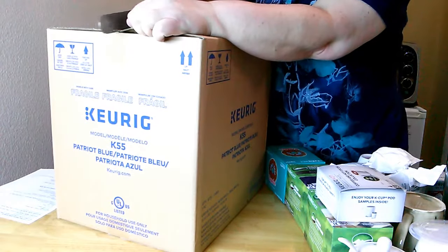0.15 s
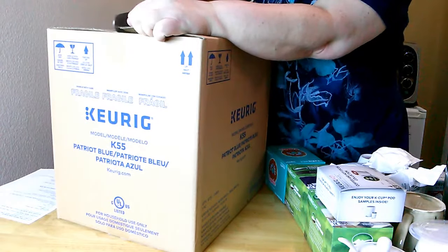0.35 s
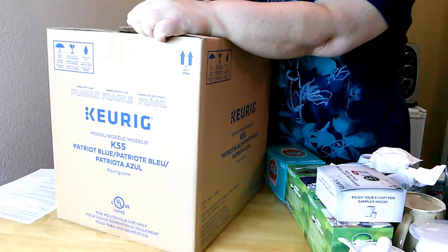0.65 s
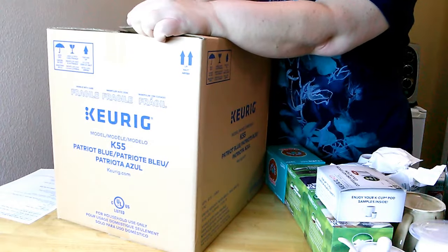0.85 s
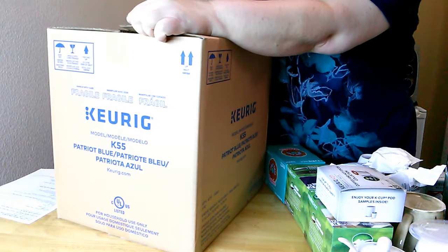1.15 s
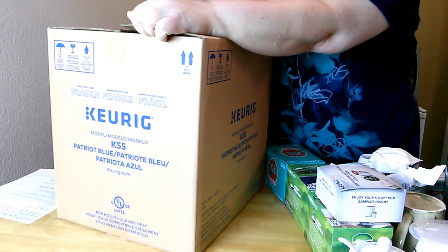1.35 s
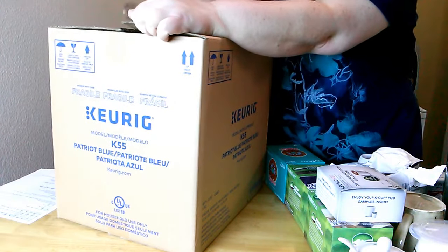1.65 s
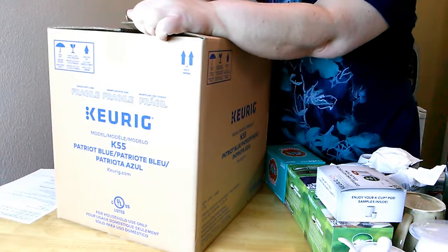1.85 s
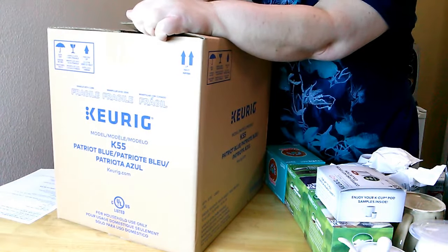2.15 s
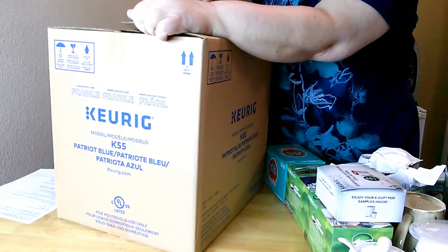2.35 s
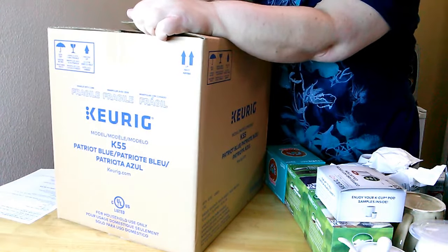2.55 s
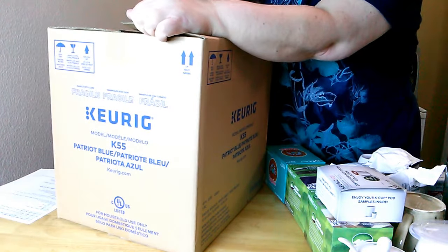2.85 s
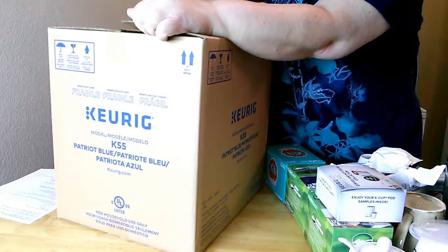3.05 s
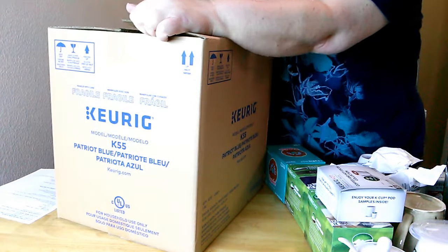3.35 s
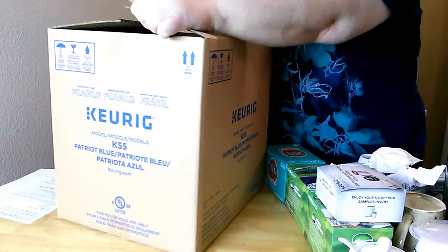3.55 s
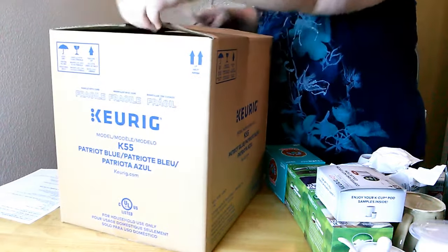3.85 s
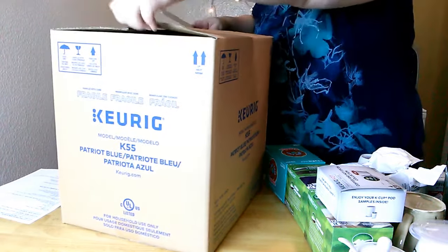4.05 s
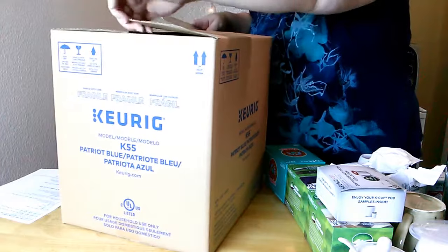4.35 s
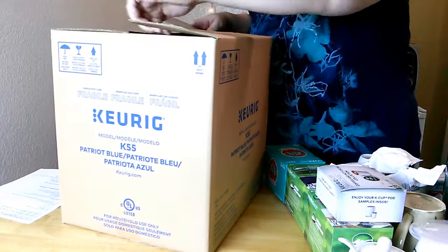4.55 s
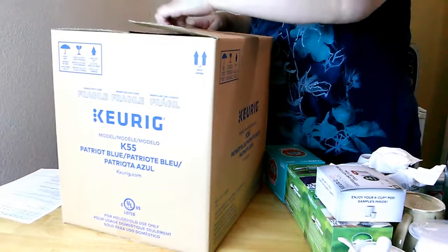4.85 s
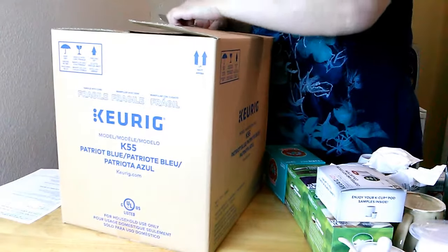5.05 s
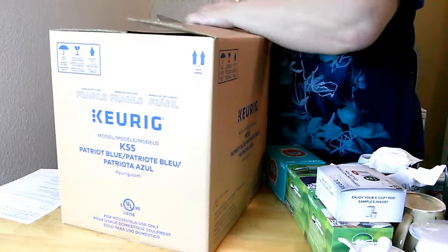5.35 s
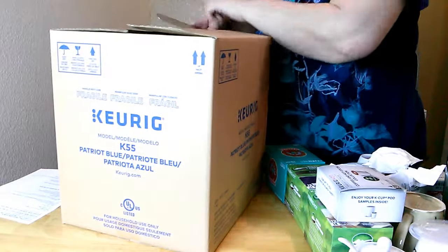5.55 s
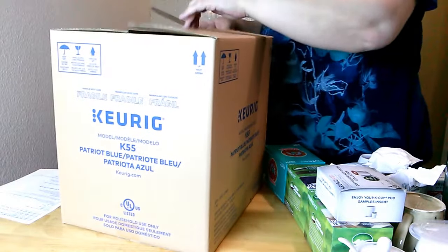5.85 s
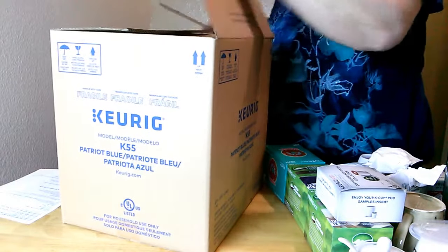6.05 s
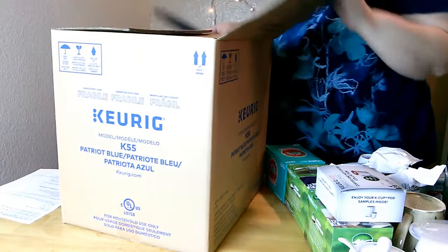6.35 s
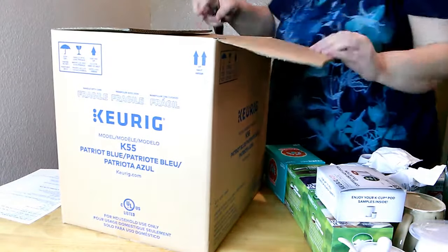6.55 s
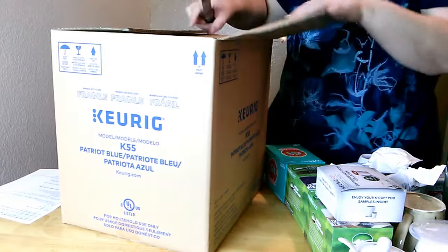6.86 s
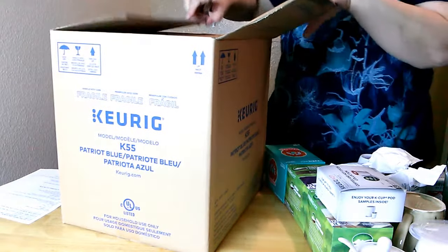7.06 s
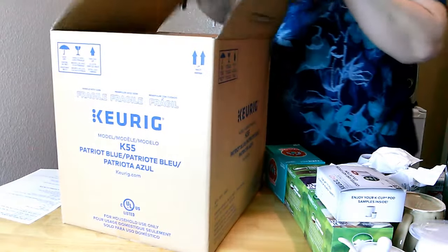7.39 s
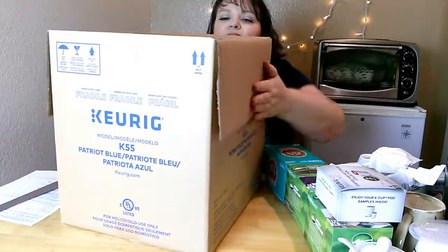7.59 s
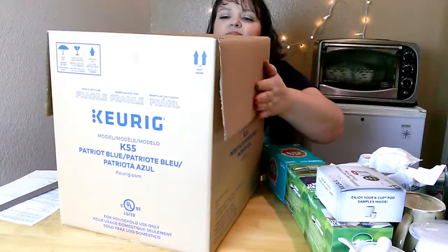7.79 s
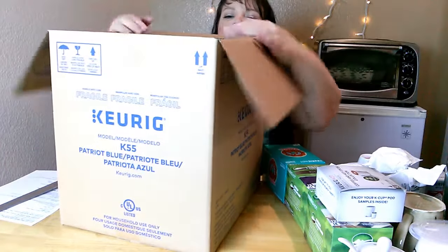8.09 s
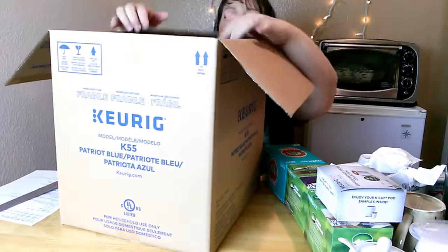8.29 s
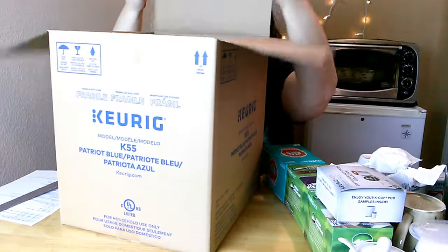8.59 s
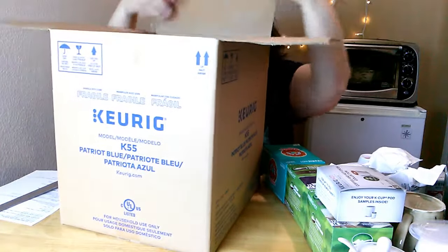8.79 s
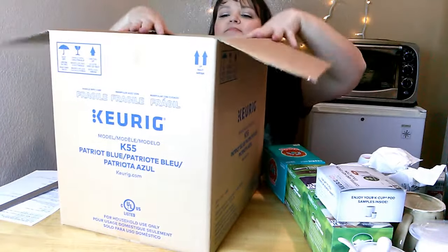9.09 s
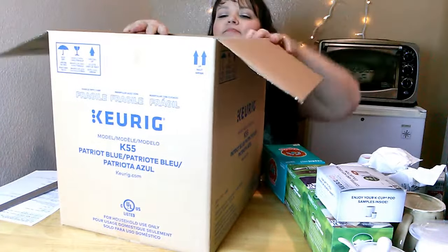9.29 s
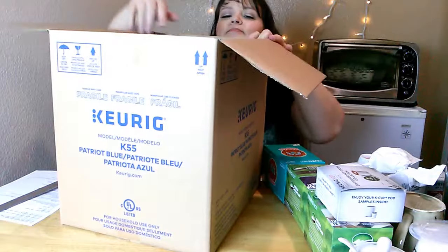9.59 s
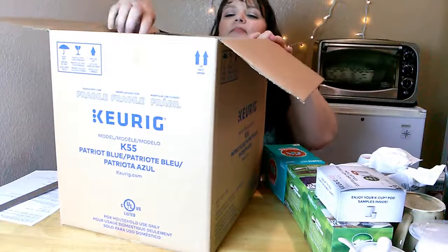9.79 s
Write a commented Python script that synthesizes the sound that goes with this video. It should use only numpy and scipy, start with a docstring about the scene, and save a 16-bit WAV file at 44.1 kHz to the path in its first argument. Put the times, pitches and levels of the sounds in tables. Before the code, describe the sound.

Close up in a small, hard-walled room, someone opens a stiff cardboard box. Crisp cracks of tape and fibres come first, mixed with boomy knocks and the uneven scratch of palms over card. Midway, a run of snaps builds to the loudest blow. The flaps then rasp and briefly creak as they fold open, and the handling goes on with scrapes and hollow thuds.

```python
"""A small hard room, one microphone close to a large cardboard box on a table. Hands and a blade work
at the taped top, then fold the flaps open. Tape and fibres snap, the panels boom when knocked, palms
and flaps scrape by stick and slip, and a fold creaks. At 7.6 s the sound breaks off and starts afresh.
The microphone has a bright peak and overloads on the loudest blows."""
import sys
import numpy as np
from scipy import signal
from scipy.io import wavfile
from scipy.ndimage import uniform_filter1d

SR = 44100
rng = np.random.default_rng(int(sys.argv[2]) if len(sys.argv) > 2 else 0)


def file_out(sig):
    """Save sig as 16-bit WAV at sys.argv[1]."""
    # one column per channel
    cols = np.atleast_2d(sig).T
    # limit, then scale
    lim = np.clip(cols, -1, 1)
    pcm = np.round(lim * 32767).astype(np.int16)
    wavfile.write(sys.argv[1], SR, pcm)


N = 437902
BREAK_S = 7.602

# Modes of the box's panels and air. Each row: pitch in Hz, width in Hz, level in dB.
BOX_MODES = [(90, 19, -12), (151.8, 52, 0.5), (181.4, 61, -2), (233.5, 22, -4), (278, 77, -5),
             (379.3, 58, 2.5), (432.8, 23, -1.5), (484.7, 28, -3), (564, 76, -3.5), (669, 66, -8),
             (839, 45, -10.5)]
# Modes of the flaps, stiff and well damped. Each row: pitch in Hz, width in Hz, level in dB.
FLAP_MODES = [(697, 667, -2), (1205, 326, 0.5), (1377, 493, 0.5), (1994, 1500, -7)]
# Dry fibres as the bright microphone hears them. Each row: frequency in Hz, level in dB.
FIBRE_SPECTRUM = [(900, -47.5), (1900, -8.5), (2700, -4), (3900, -4), (5400, 0), (6300, -1.5), (7600, -11),
                  (11000, -17), (16000, -31)]


def knocks():
    """A blow gives a short thud and wakes the box modes near its pitch most; after-touches blur them."""
    # Each row: start in seconds, level in dB, pitch that the blow favours in Hz.
    blows = [(0.048, -26.5, 90.5), (0.472, -4, 188), (0.838, -12, 240), (0.945, -17, 257),
             (1.262, -23, 340), (1.508, -24, 241), (1.755, -10.5, 810), (1.879, -12.5, 390),
             (2.081, -5, 239.6), (2.089, -2.5, 185), (2.256, -5.5, 150), (2.388, -13.5, 340),
             (2.43, -14.5, 377), (2.611, -11, 240), (3.009, -12, 254), (3.388, -24, 134), (3.58, 1.5, 396),
             (3.584, -3.5, 129), (3.897, -25.5, 400), (4.118, -25, 99.6), (4.149, -15.5, 403),
             (4.805, -22, 252), (4.908, -16, 420), (4.983, -17.5, 426), (5.023, -9.5, 442),
             (5.089, -12, 418), (5.375, -6.5, 597), (5.467, -8, 790), (5.48, 8, 430), (5.5, -4, 165),
             (5.956, -17.5, 342), (6.019, -20.5, 173), (6.245, -16, 890), (7.7, -22, 619), (7.723, 1, 132),
             (8.142, -15.5, 128), (8.258, -20.5, 375), (8.448, -18, 571), (8.507, -20.5, 388),
             (8.581, -14.5, 405), (8.749, -6.5, 160), (8.753, -6.5, 520), (8.914, -22, 151),
             (9.039, -17.5, 135), (9.741, -16, 694), (9.875, -1.5, 182), (9.881, -4.5, 620)]
    out, t = np.zeros(N), np.arange(1500) / SR
    mode_hz = np.array(BOX_MODES)[:, :1]
    for start, db, hz in blows:
        spread_octaves = np.clip(0.9 + 0.008 * db, 0.2, 2)  # harder blows wake more modes
        woken = 1 / (1 + (np.log2(mode_hz / hz) / spread_octaves) ** 2)
        thud = ring([(hz, 0.79 * hz, 0)], size=6000)
        body = ring(BOX_MODES, woken, size=6000) + 0.52 * thud
        push = 0.044 * rng.standard_normal(len(t)) * np.exp(-t / 0.012)
        push[0] = 1  # the blow itself, ahead of the after-touches
        boom = signal.fftconvolve(push, body)
        add(out, start, 0.88 * gain_of(db) * boom / abs(boom).max())
    return out


def snaps():
    """Tape and fibres let go in a burst, then a few splinters, heard bare and through the card."""
    # Each row: start in seconds, level in dB, share that the card takes up in dB.
    tears = [(0.0476, -32, 1), (0.362, -28.5, -11), (0.4721, 3.5, 1), (0.5317, -3.5, -9), (0.6, -14, -22),
             (0.629, -5.5, -17), (0.6584, -3, -8), (0.718, -12.5, -20), (0.835, -18, 4),
             (1.0207, -17, -4.5), (1.1266, -23.5, -3), (1.33, -34, -3), (1.484, -30, -5), (1.51, -24.5, 0),
             (1.6008, -18.5, -10), (1.854, -27.5, -10), (1.8816, -27.5, 11.5), (1.939, -19.5, -12),
             (2.0783, -17.5, 9.5), (2.0906, -8.5, 0.5), (2.248, -19, 8.5), (2.392, -14, 6),
             (2.4298, -13, -2.5), (3.0651, -15, -3.5), (3.144, -20.5, -36), (3.1835, -15, -13),
             (3.2632, -17.5, -17), (3.436, -31.5, -8), (3.5833, -11.5, 1), (3.5994, -3, -6),
             (3.8938, -31, 3), (4.123, -23.5, -0.5), (4.302, -29.5, 8.5), (4.4432, -28.5, -34),
             (4.6942, -9, 0), (4.7321, -12.5, -17), (4.804, -16, 0.5), (4.8504, -9.5, -1.5),
             (4.9105, -9, -3.5), (4.9837, -7, -7), (5.024, 2.5, -5), (5.092, -4, 1), (5.1478, -11.5, -10),
             (5.1622, -9, -3), (5.376, -6.5, 6.5), (5.3931, -7, -4), (5.468, 4, 3), (5.766, -35, 11.5),
             (6.1183, -21.5, -9), (6.1661, -22, -7), (6.434, -24.5, -2.5), (7.3937, -27.5, -33),
             (7.6997, -23, 20), (7.7249, -20, 14.5), (7.837, -33, -10), (7.935, -35, 9), (8.0502, -22, -1),
             (8.4482, -10, 2), (8.5372, -15.5, 7), (8.5834, -4, -8.5), (8.7474, -19, 5), (9.3585, -25, 4.5),
             (9.7173, -23.5, -13), (9.8776, -36.5, 26)]
    bare, card, t = np.zeros(N), np.zeros(N), np.arange(4000) / SR
    tear = (1 - np.exp(-t / 0.0016)) * np.exp(-t / 0.0065)
    for start, db, card_db in tears:
        noise, scatter = rng.standard_normal((2, len(t)))
        clumps = unit_rms(uniform_filter1d(scatter, 90)) ** 2
        splinters = 0.089 * clumps * (1 - np.exp(-t / 0.00078)) * np.exp(-t / 0.036)
        burst = 0.5 * noise * (tear + splinters)
        add(bare, start, gain_of(db) * burst)
        add(card, start, gain_of(db + card_db) * burst)
    return through(bare, colour(FIBRE_SPECTRUM)) + through(card, ring(FLAP_MODES))


def rubbing():
    """The same slips scratch the surface and rasp the card; slower lurches shake the lid and walls."""
    scratch, rasp, on_lid, on_walls = hand_strokes()
    slips = wandering_contact(stick_slip(per_s=1300, spread_db=3, hiss=1.4), depth_db=2.5)
    lurches = stick_slip(per_s=230, spread_db=4, hiss=1.3)
    is_lid = np.array(BOX_MODES)[:, :1] > 330  # lower modes belong to the big walls
    # Air pushed by the swaying panels.
    sway = colour([(15, -15), (40, -23), (70, 3.5), (120, 1.5), (400, -63.5)], size=8192)
    walls = ring(BOX_MODES, ~is_lid, size=8192) + gain_of(-14) * sway
    return (through(scratch * slips, colour(FIBRE_SPECTRUM))
            + through(rasp * slips, ring(FLAP_MODES))
            + through(on_lid * lurches, ring(BOX_MODES, is_lid))
            + through(on_walls * lurches, walls))


def hand_strokes():
    """Envelopes of scratch, rasp, lid and walls: a palm or flap lands, swells or sags, and lifts."""
    # Each row: start and length in seconds, swell from start to end in dB, then levels in dB of
    # surface scratch, card rasp, weight on the lid and weight on the walls.
    strokes = [(0.036, 0.1, 0, -49, -33, -37, -34), (0.085, 0.32, -10, -53, -56, -49, -49.5),
               (0.344, 0.54, 0, -40.5, -38.5, -36, -39.5), (0.757, .6, -6, -46, -44.5, -39.5, -31),
               (1.441, 0.32, 9, -45, -42, -32, -28), (1.633, 0.21, 0, -40, -39, -40, -39),
               (1.836, 0.15, -4, -65, -43, -52, -29.5), (2.008, 0.35, -1, -53, -50, -54, -53),
               (2.262, 0.46, 7, -36, -36, -36, -35), (2.574, 0.32, -3.5, -29.5, -32.5, -30.5, -25.5),
               (2.79, 0.47, 4, -37, -39.5, -32, -31.5), (3.337, 0.21, -10, -50, -51, -52, -46),
               (3.505, 0.19, 15, -26, -29.5, -21.5, -40), (3.585, .1, -3, -22, -30, -22, -48),
               (3.678, 0.22, -5, -47, -46, -47, -49), (3.861, 0.1, -5, -47.5, -37.5, -49, -37),
               (4.015, 0.12, 6, -48.5, -46, -67, -40), (4.101, 0.25, -19, -46, -45, -37, -40),
               (4.37, .36, 5, -44, -44.5, -43.5, -46), (4.644, 0.46, -1, -41.5, -47, -38, -42.5),
               (5.131, .14, -5, -30.5, -34, -40, -40), (5.342, 0.28, 6, -32.5, -33, -29, -50),
               (5.47, .16, -8, -40, -36, -18, -36), (5.75, .1, -4, -52, -42, -38, -44),
               (5.515, .24, -7.5, -52.5, -52.5, -39.5, -42), (5.947, 0.21, -5, -51, -49.5, -43.5, -36.5),
               (6.09, 0.16, -2, -45.5, -40, -45, -48), (6.236, 0.083, -4, -54, -34.5, -41, -50),
               (6.401, 0.41, -13, -55, -57, -51, -49.5), (6.737, 0.11, -5, -44.5, -45, -38, -44),
               (6.949, .27, -7, -40.5, -41.5, -39, -42.5), (6.986, 0.12, -3, -43, -25.5, -42, -42),
               (7.2, 0.34, -2, -64, -59.5, -57, -52), (7.479, 0.32, 3, -34, -31.5, -36.5, -42),
               (7.603, 0.29, 2, -40, -36, -32.5, -33), (7.898, 0.073, 0, -57, -45, -41, -42),
               (7.945, 0.19, 7, -41, -45, -39.5, -40), (8.06, 0.39, -4.5, -31, -37, -46, -37),
               (8.35, 0.44, 4, -37.5, -35, -34.5, -36.5), (8.415, .1, 0, -28, -28, -34, -40),
               (8.703, 0.18, -10, -37, -36.5, -27.5, -47), (8.87, .32, 5, -41, -42.5, -37.5, -39),
               (9.169, 0.21, 5, -52.5, -48, -52, -48.5), (9.33, 0.52, -3, -41.5, -36, -39, -37),
               (9.848, 0.13, -3, -45.5, -39, -22.5, -43)]
    # The box is never quite let go: resting levels in dB of scratch, rasp, lid and walls.
    rest_db = [-69, -70.5, -59.5, -57.5]
    land_s, lift_s, touch_db = 0.046, 0.071, -19
    power = np.outer(np.ones(N), gain_of(rest_db) ** 2)
    for start, length, swell_db, *levels_db in strokes:
        t = np.arange(0, length, 1 / SR)
        land, lift = np.minimum([land_s, lift_s], 0.5 * length)
        loose = np.clip(np.maximum(1 - t / land, 1 - (length - t) / lift), 0, 1)
        shape = gain_of(touch_db * loose + swell_db * (t / length - 0.5))
        shape *= (start + t < BREAK_S) == (start < BREAK_S)  # no stroke outlasts the break
        add(power, start, np.outer(shape, gain_of(levels_db)) ** 2)
    return np.sqrt(power).T


def stick_slip(per_s, spread_db, hiss):
    """Card catches and lets go: sparse clicks of uneven size over a smooth hiss."""
    sizes = gain_of(spread_db * np.minimum(rng.exponential(1, N), 4))
    slipping = rng.random(N) < per_s / SR
    clicks = unit_rms(sizes * slipping * rng.standard_normal(N))
    return unit_rms(clicks + hiss * rng.standard_normal(N))


def wandering_contact(x, depth_db):
    """The contact wanders over the card, so patches of the spectrum come and go."""
    spectrum = signal.stft(x, nperseg=512)[2]
    patches = uniform_filter1d(rng.standard_normal(spectrum.shape), 9, axis=0)
    patches = unit_rms(uniform_filter1d(patches, 10, axis=1))
    return signal.istft(spectrum * gain_of(depth_db * patches), nperseg=512)[1][:N]


def creaks():
    """A short run of slips in a fold of the card rings its few modes."""
    # Each row: start in seconds, level in dB.
    slip_runs = [(6.435, -43.5), (6.515, -40), (6.585, -41), (6.686, -39.5), (6.777, -28.5)]
    # Each row: pitch in Hz, width in Hz, level in dB.
    fold_modes = [(850, 50, -6), (1440, 53, 5), (2390, 99, -9.5)]
    out = np.zeros(N)
    for start, db in slip_runs:
        slips = rng.standard_normal(700) * np.hanning(700)
        creak = signal.fftconvolve(slips, ring(fold_modes))
        add(out, start, gain_of(db) * creak / abs(creak).max())
    return out


def room(x, wet_db, patterns=4):
    """The hands move about the box, so the pattern of echoes keeps changing."""
    turn = np.pi * 4.5 * np.arange(len(x)) / SR
    shares = [np.sqrt(2 / patterns) * np.cos(turn + np.pi * k / patterns) for k in range(patterns)]
    return x + gain_of(wet_db) * sum(through(x * share, echoes()) for share in shares)


def echoes():
    """Hard walls return sparse echoes of random sign, each band dying at its own speed."""
    # Each row: frequency in Hz, time to fall by 60 dB in seconds.
    decay_times = [(100, 0.37), (700, 0.3), (5000, 0.25), (12000, 0.29)]
    taps = np.zeros(SR // 2)
    slots = np.arange(140, len(taps) - 20, 20)
    taps[slots + rng.integers(0, 20, len(slots))] = rng.choice([-1., 1.], len(slots))
    hz, t, spectrum = signal.stft(taps, SR, nperseg=256)
    decay = gain_of(-60 * t / curve_at(decay_times, hz)[:, None])
    tail = signal.istft(spectrum * decay, SR, nperseg=256)[1]
    return tail / np.linalg.norm(tail)


def room_tone():
    """Steady noise of the room and the microphone."""
    # Each row: frequency in Hz, level in dB.
    noise_spectrum = [(18, -20.5), (30, -3.5), (220, -14), (700, -23), (3000, -36.5), (16000, -41.5)]
    return gain_of(-49) * through(rng.standard_normal(N), colour(noise_spectrum, size=8192))


def suppress(x, knee_db, slope):
    """A noise suppressor pulls the moments below its knee further down."""
    power_db = 10 * np.log10(abs(uniform_filter1d(x ** 2, 900)) + 1e-12)
    under_db = np.clip(knee_db - power_db, 0, 14)
    return x / gain_of(slope * uniform_filter1d(under_db, 400))


def ring(modes, weight=1., size=4096):
    """Response of struck modes: dying sines of alternate sign, energy 1."""
    hz, width, db = np.transpose(modes)[:, :, None]
    t = np.arange(size) / SR
    sign = (-1.) ** np.arange(len(modes))[:, None]
    strength = sign * weight * gain_of(db) * np.sqrt(width)
    taps = (strength * np.exp(-np.pi * width * t) * np.sin(2 * np.pi * hz * t)).sum(0)
    return taps / np.linalg.norm(taps)


def colour(spectrum, size=2048):
    """Minimum-phase filter of energy 1 with the given spectrum."""
    hz = abs(np.fft.fftfreq(size * 4, 1 / SR))
    log_gain = curve_at(spectrum, hz) * np.log(10) / 20
    taps = np.fft.ifft(np.exp(np.conj(signal.hilbert(log_gain)))).real[:size]
    return taps / np.linalg.norm(taps)


def curve_at(points, hz):
    point_hz, value = np.transpose(points)
    return np.interp(np.log(hz + 1), np.log(point_hz + 1), value)


def through(x, taps):
    return signal.oaconvolve(x, taps)[:len(x)]


def gain_of(db):
    return 10 ** (np.asarray(db) / 20)


def unit_rms(x):
    return x / np.sqrt(np.mean(x ** 2) + 1e-20)


def add(mix, start_s, sound):
    part = mix[round(start_s * SR):][:len(sound)]
    part += sound[:len(part)]


def scene():
    """The box in its room: the low blows reach the microphone drier, and echoes stop at the break."""
    cut, out = round(BREAK_S * SR), room_tone()
    handling = 0.9 * rubbing() + snaps() + creaks()
    for source, wet_db in (handling, -3), (knocks(), -8):
        out += np.concatenate([room(source[:cut], wet_db), room(source[cut:], wet_db)])
    return out[None]


def record(dry):
    """Bass and treble are suppressed apart, the input clips, and the extreme lows and highs are cut."""
    bass = signal.oaconvolve(dry, signal.firwin(1023, 700, fs=SR)[None], "same")
    quiet = suppress(bass, knee_db=-41, slope=1) + suppress(dry - bass, knee_db=-40.5, slope=0.35)
    clipped = np.clip(quiet, -1, 1)
    low_cut = signal.lfilter(*signal.butter(2, 22, "high", fs=SR), clipped)
    band_limit = signal.firwin(511, 16100, window=("kaiser", 9), fs=SR)
    return signal.oaconvolve(low_cut, band_limit[None], "same")


dry = scene()
out = record(dry)
file_out(out)
```